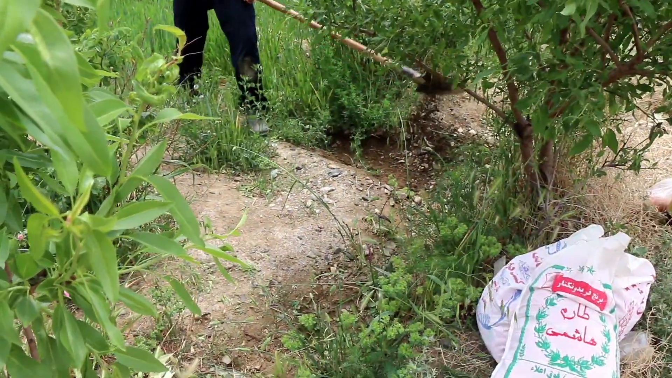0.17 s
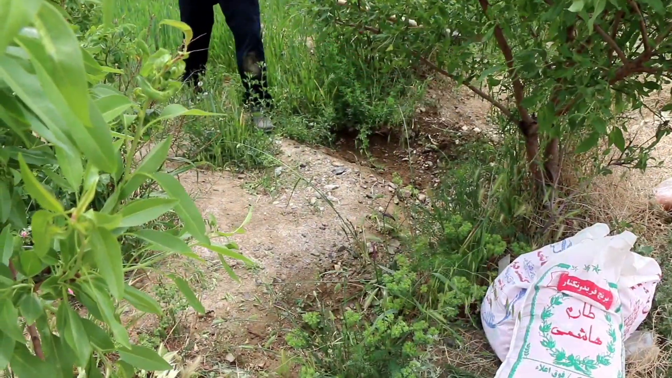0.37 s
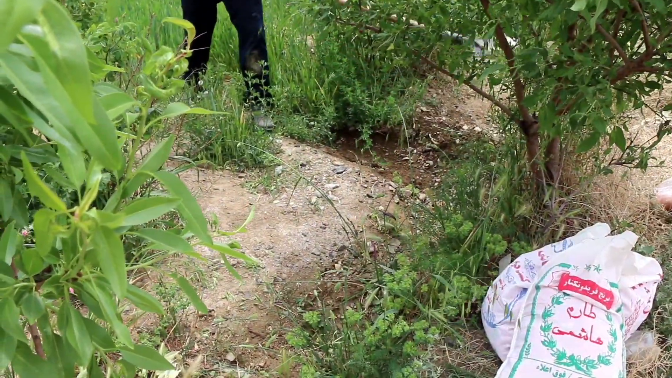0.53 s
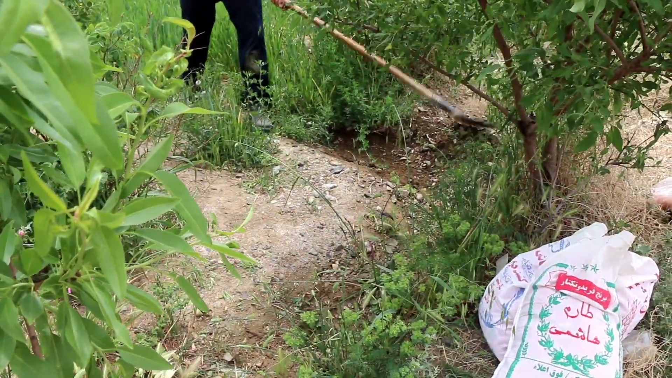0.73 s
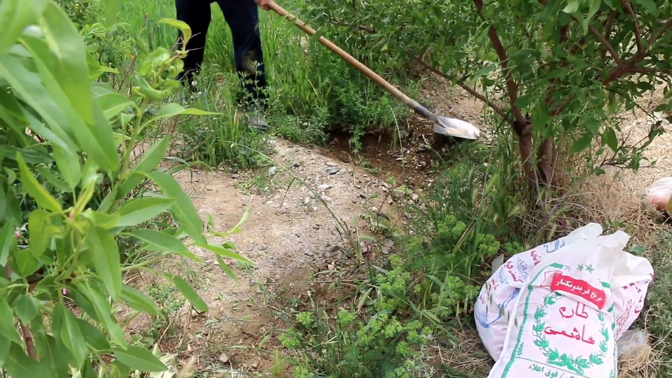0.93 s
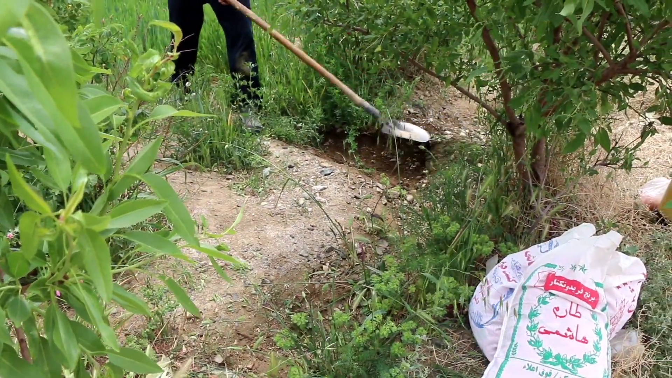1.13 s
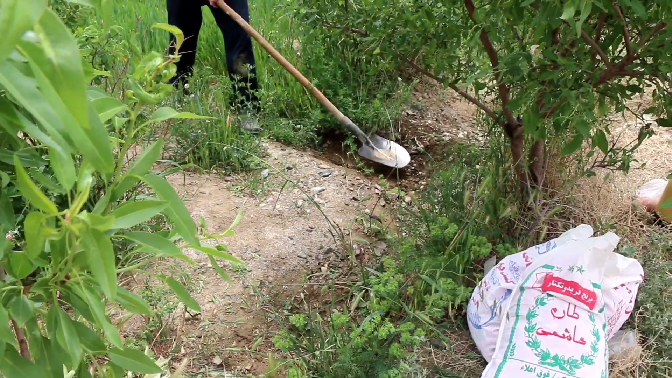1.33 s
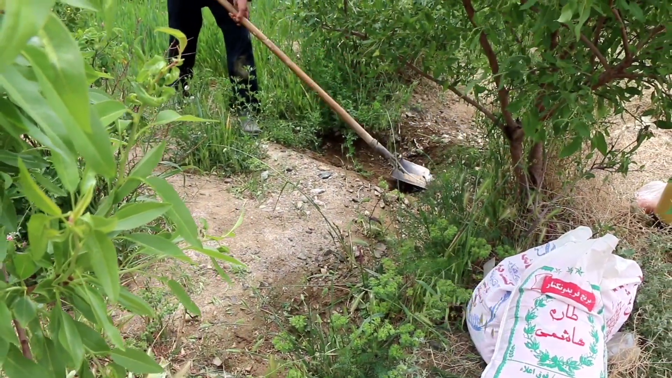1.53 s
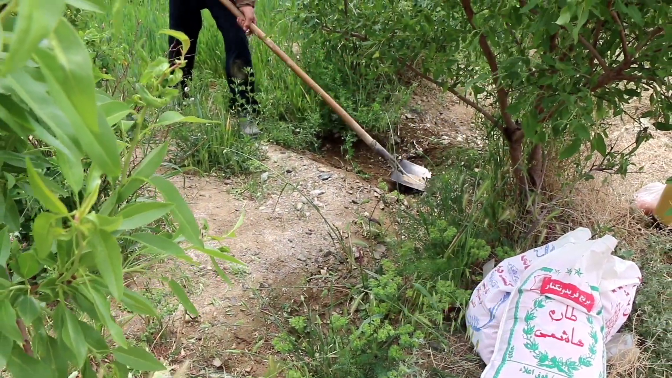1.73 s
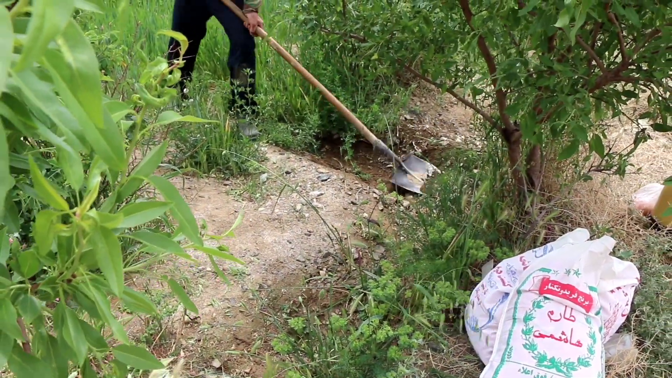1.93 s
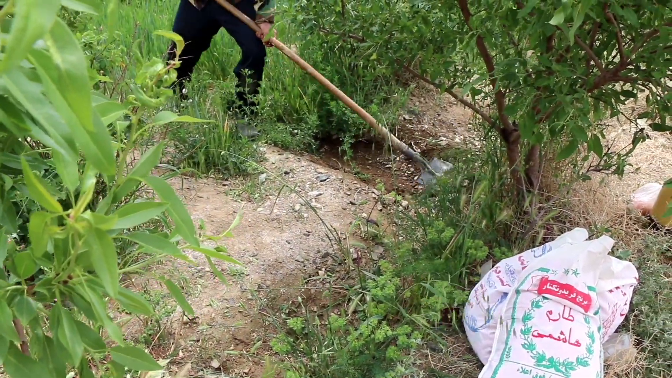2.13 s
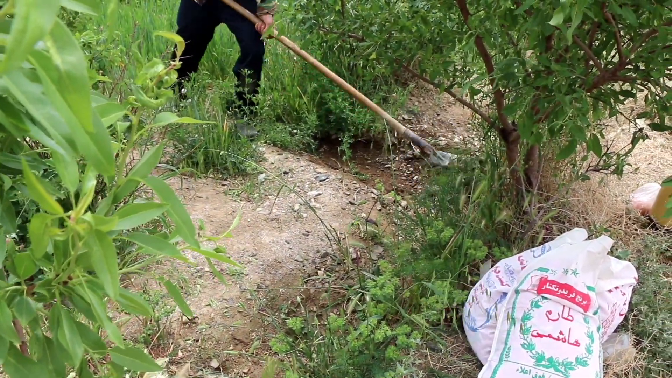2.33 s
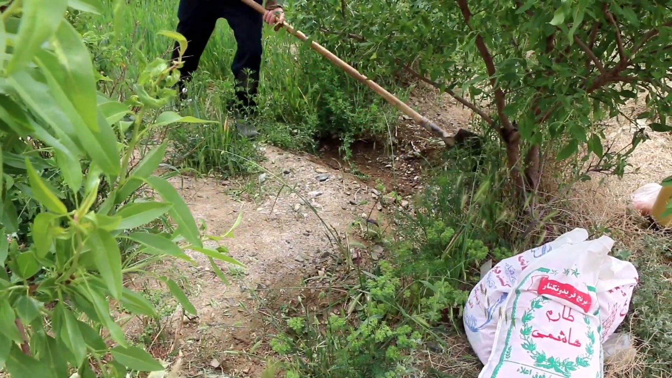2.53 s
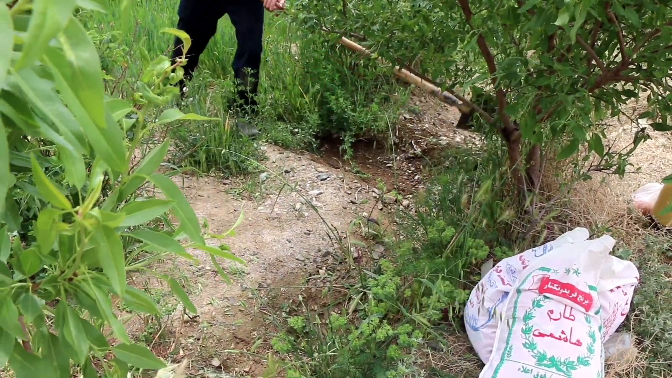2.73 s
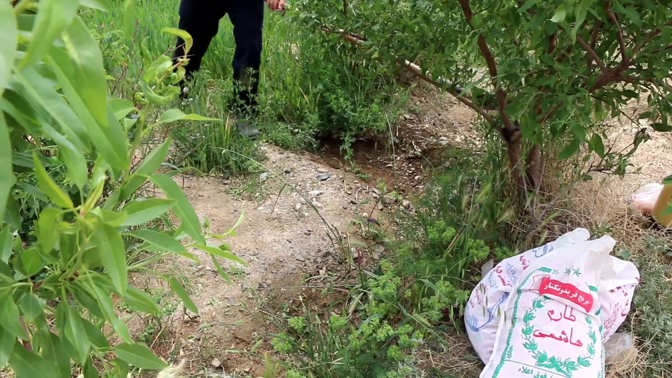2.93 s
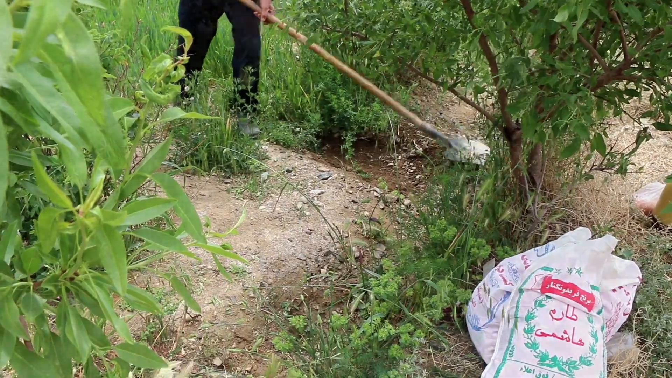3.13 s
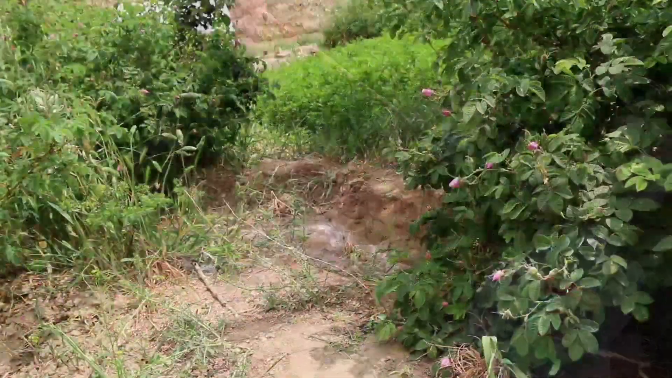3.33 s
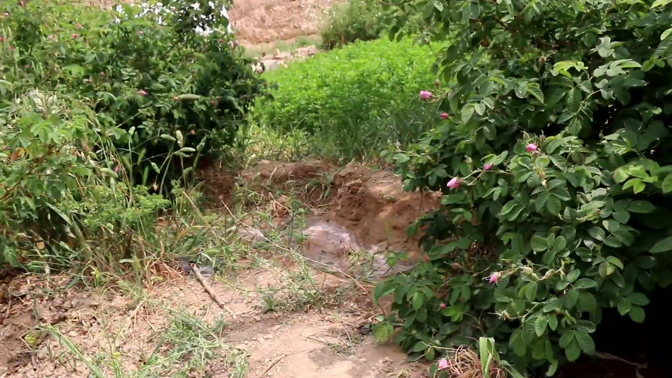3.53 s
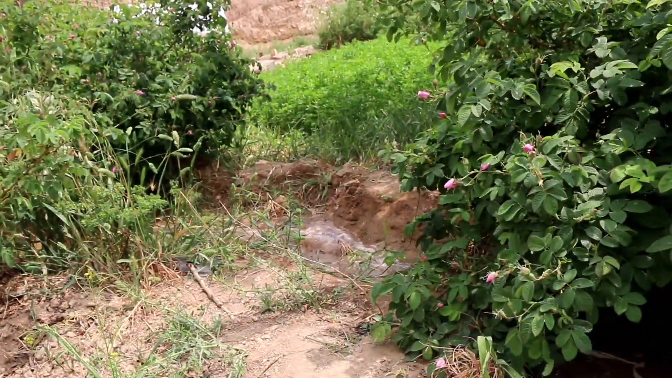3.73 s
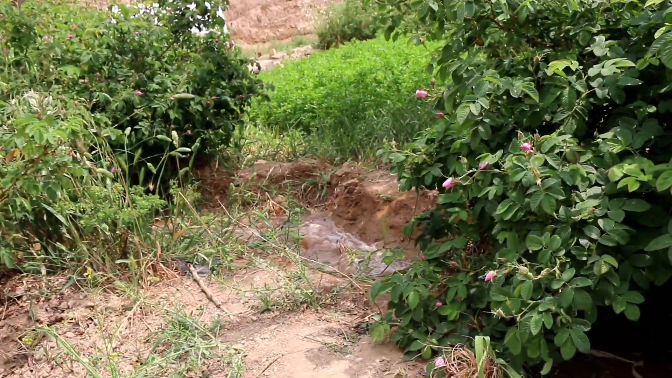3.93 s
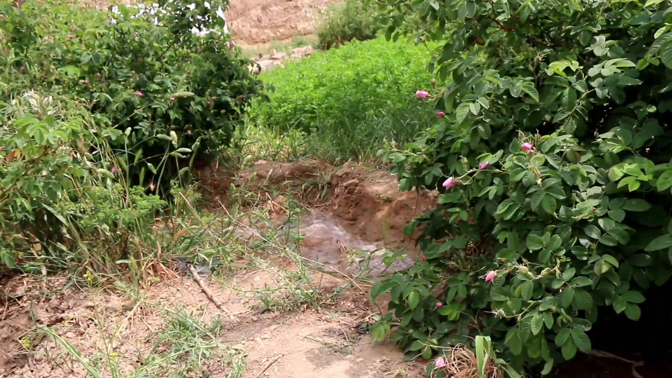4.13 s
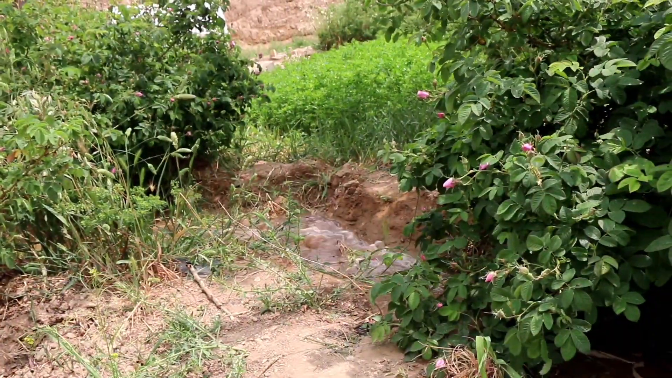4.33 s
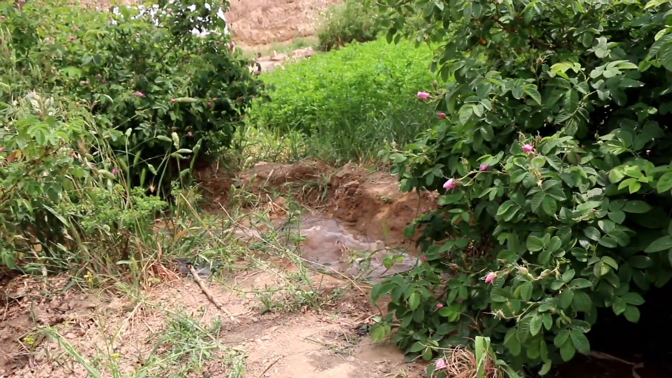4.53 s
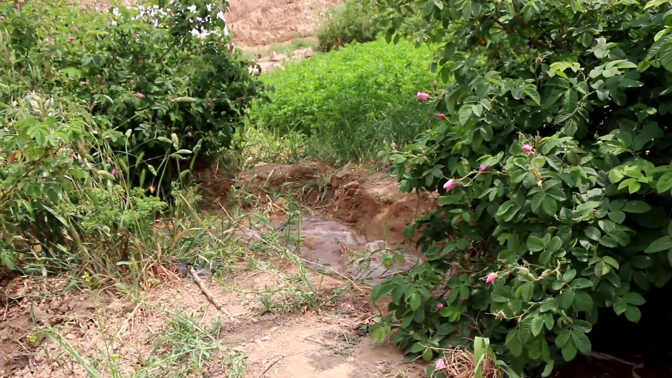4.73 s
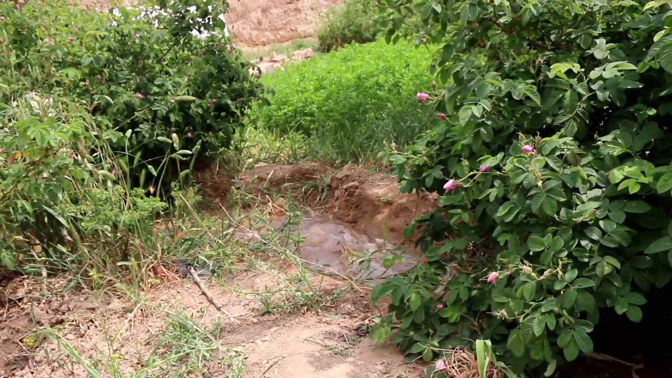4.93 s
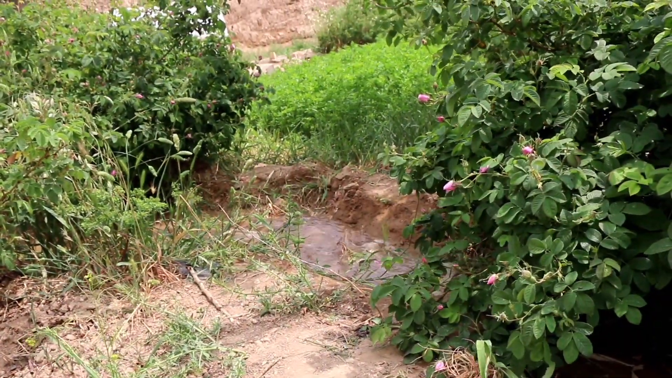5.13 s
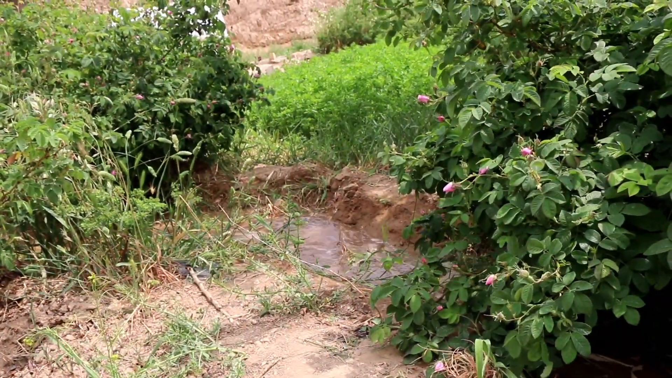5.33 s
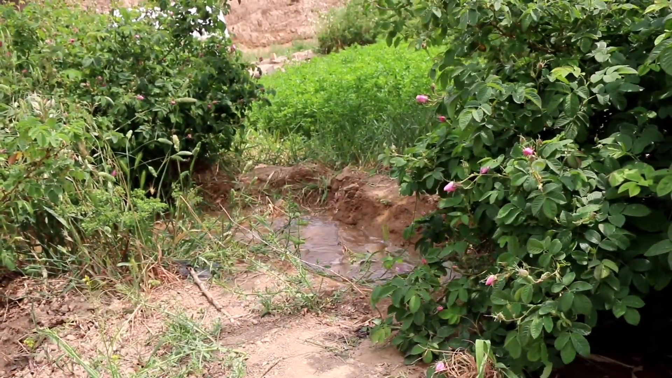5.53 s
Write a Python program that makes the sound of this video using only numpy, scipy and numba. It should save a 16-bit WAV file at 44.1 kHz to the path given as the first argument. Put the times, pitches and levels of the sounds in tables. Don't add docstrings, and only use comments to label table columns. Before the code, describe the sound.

A stereo phone outdoors picks up a shovel a few metres away, dry and without echo, over faint leaves. Early wind thumps until 0.3 s accompany small knocks and a gritty scrape, a clipped tick at 0.32, then crumbs ticking down. At 0.79 a very loud, bright stone-on-steel clank briefly dips the background, followed by rattling grit and thin squeaks to 1.1 and a soft trickle. A faint bird chirp falls at 1.37. A hard stab and clank hits at 1.5, then pattering crumbs. From 1.9 to 2.4 come the densest crunching scrapes and blows, strongest near 2.05. Light knocks, a brief metallic hum and sifting soil follow to 2.9. A last sharp blow at 3.18 spills a long trickle as water fades in, full by 3.4. Steady low gurgling and midrange fizz continue, with a small splash and thud near 5.37, under repeated deep, mostly left-leaning wind buffets to the end at about 5.7.

```python
import sys
import numpy as np
from scipy import signal
from scipy.fft import rfft, irfft
from scipy.io import wavfile
from scipy.ndimage import uniform_filter1d
from numba import njit

SR = 44100
rng = np.random.default_rng(int(sys.argv[2]) if len(sys.argv) > 2 else 0)


def persist_wave(psi):
    counts = np.round(np.clip(psi, -1, 1) * 32767).astype(np.int16)
    wavfile.write(sys.argv[1], SR, np.atleast_2d(counts).T)


def to_linear_factor(level_db):
    exponent = np.asarray(level_db, float) / 20
    return 10 ** exponent


N = 250488
SECONDS = np.arange(N) / SR
FREQS_HZ = np.maximum(np.arange(N // 2 + 1) * SR / N, 1)

# hardest push [s], grit level [dB], rise [s], fall [s], relative thud [dB].
STROKES = [(.124, -33, 0.16, 0.083, -23), (.72, -41, .005, 0.043, -10), (0.784, -32.5, 0.037, 0.0043, -13),
           (0.828, -30.5, 0.0086, 0.06, -11), (.93, -39, 0.081, 0.19, -21), (1.05, -40, 0.13, 0.084, -5.5),
           (1.521, -23, .006, 0.075, -6), (1.92, -33, 0.078, 0.097, 0), (2.053, -19, 0.06, 0.01, -3),
           (1.981, -28.5, 0.013, 0.091, -1), (2.088, -28.5, 0.11, 0.11, 0), (2.201, -37, 0.089, 0.038, 4),
           (2.311, -40, 0.14, 0.022, -6), (2.42, -51, 0.23, 0.068, -15), (2.6, -32, 0.18, 0.2, -36),
           (2.715, -42, 0.21, 0.016, -32), (2.84, -58, 0.13, 0.22, -21)]
# peak [s], grit level [dB], rise [s], fall [s], relative thud [dB].
TRICKLES = [
    (1.2, -42.5, 0.14, 0.095, -0.5),
    (1.32, -47, 0.21, 0.51, -3),
    (1.66, -46, 0.11, 0.22, -16),
    (1.78, -41.5, 0.052, 0.18, -6),
    (2.894, -41, 0.021, 0.021, 3),
    (3.25, -34.5, 0.012, 0.32, -8),
    (.55, -54, 0.27, 0.15, 3),
]
STROKE_FADE_DB, STROKE_ROUND = 24, 1.32
STROKE_TREBLE_DB, TRICKLE_TREBLE_DB, TREBLE_DB_PER_PUSH_DB = -8, -22.5, 0.041
# start [s], peak [dB], relative treble [dB], decay t60 [s].
BITES = [(0.403, -28.5, -14, 0.079), (0.519, -34.5, 3.5, 0.037), (1.5064, -3, -10, 0.053),
         (1.5308, -8.5, -13, 0.077), (1.552, -18, -21, 0.039), (1.566, -15, -11, 0.019),
         (1.8987, -25.5, -3, 0.082), (1.931, -30, -.3, 0.03), (1.9393, -23, -.3, .03),
         (1.9642, -11.5, -8, 0.093), (2.0005, -14, -12, 0.04), (2.0495, -9.5, -2, 0.016),
         (2.0537, -3.5, -8, 0.018), (2.0889, -5.5, -28, 0.014), (2.2, -24, -25, .04),
         (2.156, -24, -20, .03), (2.3273, -14, -17, 0.068), (2.371, -22.5, -17, 0.05),
         (2.45, -28, -5, 0.029), (2.5176, -28, -8, 0.037), (2.9333, -30, -25, 0.018),
         (3.181, -2.5, -7, 0.035), (3.248, -18.5, -20, 0.051), (3.2868, -22, -11, 0.054),
         (5.373, -17.5, -23, 0.088)]
# start [s], peak [dB], relative treble [dB], decay t60 [s].
KNOCKS = [(0.038, -19.5, -20.5, 0.086), (0.0697, -25, -8, 0.043), (0.082, -16.5, -32.5, 0.026),
          (0.091, -21, -21, 0.034), (0.117, -20, -24, 0.026), (0.1344, -32, -26, 0.051),
          (0.32, -14, -12, 0.0063), (0.3232, -12.5, -5, 0.011), (0.327, -23, -4, .02),
          (0.7175, -26, -11, 0.04), (.7245, -31, 0, .04), (0.7682, -24, -9, 0.056), (.757, -33, -6, .04),
          (0.7904, 1, -2.5, 0.026), (0.7929, -1.5, -2.5, 0.033), (0.802, -9.5, -5, .05),
          (0.8105, -10, -6.5, 0.057), (.845, -27, -9, 0.055), (0.903, -29, -11, 0.064),
          (0.933, -30, -2, 0.036), (.9445, -27, -8, .025), (0.9646, -27, -11, 0.06),
          (.98, -23.5, -14, 0.067), (.992, -23, -10, 0.044), (1.024, -34, -4, 0.057), (1.031, -32, -4, .04),
          (1.038, -28, -3, .04), (1.046, -28, -5, .03), (1.077, -33, -12, .04), (1.4989, -0.5, -13, 0.047),
          (1.513, -6.5, -3, 0.04), (2.018, -12, -9, .05), (2.0256, -7.5, -4, 0.033), (2.033, -13, -8, .025),
          (2.042, -11, -11, .04), (2.121, -28, -22, .04), (2.105, -13, -22, 0.018),
          (2.389, -24, -11, 0.032), (2.557, -21, -12, 0.02), (2.5648, -9.5, -23, 0.021),
          (2.613, -25.5, -31, 0.16), (2.6668, -23.5, -4, 0.12), (2.7109, -24, 0.5, 0.081),
          (3.181, -2, -17, 0.046), (3.186, -5, -7.5, 0.027)]
BITE_THUD_DB, KNOCK_THUD_DB, BITE_CRACK_DB, KNOCK_CRACK_DB = -4.5, -24, -3, 3
# frequency [Hz], density [dB per Hz].
GRIT_SPECTRUM = [(120, -78), (200, -17), (508, -14), (706, -6.5), (981, -18), (1470, -4), (2110, -6.5),
                 (2540, 1), (3280, -3), (3940, -2.5), (5180, -6), (5890, -5.5), (6570, -5), (11000, -7),
                 (15800, -23.5)]
# frequency [Hz], level [dB], t60 [s].
BLADE_MODES = [(1270, -19, 0.048), (1525, -8.5, 0.039), (1750, -4, 0.11), (1898, -5, 0.059),
               (2500, -15, 0.12), (2630, -14.5, 0.014), (2900, -9, 0.19), (3070, -29, 0.023),
               (3700, -15.5, 0.034), (3950, -14, 0.029), (4820, -22, 0.018), (5920, -3, 0.035),
               (7380, -4, 0.03), (8640, -16, 0.025)]
# peak [s], level [dB], rise [s], fall [s].
SINGING = [
    (.41, -57, .06, .15),
    (.57, -56, .13, .07),
    (2.825, -51, .04, .06),
    (2.885, -49, .05, .025),
]
# peak [s], level [dB], rise [s], fall [s].
HUMMING = [
    (2.6, -48, .11, 0.061),
    (2.67, -61, 0.036, 0.035),
    (2.72, -45, 0.03, 0.069),
]
# peak [s], level [dB], rise [s], fall [s].
BOWED = [
    (.05, -46, .05, .05),
    (.16, -45, .06, .04),
    (.09, -46, .06, .1),
    (.92, -48, .04, .06),
    (1.045, -44, .04, .06),
    (1.03, -52, .12, .02),
    (1.91, -42, .03, .03),
    (2.63, -44, .05, .05),
]
BOWED_HZ = [2550, 2520, 1650, 2500, 2510, 7120, 2550, 2950]
BOWED_T60_S = 0.038
# start [s], peak [dB], frequency [Hz], t60 [s].
PINGS = [(.322, -22, 4580, 0.0088), (.324, -36, 370, 0.034), (0.563, -39, 2610, 0.045),
         (.718, -33, 3300, 0.026), (0.794, -12, 2920, 0.035), (0.811, -22, 1785, 0.068),
         (0.934, -28.5, 3710, 0.054), (1.4, -34, 3400, .03), (.99, -43, 3300, .03), (0.06, -30, 2500, .04),
         (0.11, -33, 2500, 0.037), (2.625, -34, 2200, .05), (2.655, -25, 3000, 0.038),
         (1.025, -33, 4770, 0.026), (1.553, -19.5, 1270, 0.045), (1.507, -11, 1460, 0.056),
         (2.5, -16.5, 2570, 0.018), (2.445, -33, 490, 0.0061), (2.559, -25, 8400, 0.029),
         (2.615, -22, 1724, 0.081), (3.19, -17.5, 1750, 0.056), (2.0892, -14.5, 1290, 0.014),
         (1.4992, -15.5, 5400, 0.015), (1.512, -17, 2700, 0.032), (1.531, -23, 3200, .035),
         (1.542, -23, 2700, .03), (1.552, -25, 2400, .04), (.8, -25, 8400, 0.079), (.802, -23, 9800, 0.039),
         (.769, -34, 2700, .03), (3.182, -11.5, 4790, 0.017), (.117, -26, 1600, 0.018),
         (0.87, -32, 3700, .025), (2.935, -40.5, 1360, 0.012)]
CHIPS_DB = -9.5
# start [s], peak [dB].
CRUMBS = [(0.2104, -49), (0.2548, -42), (0.2803, -28), (0.2972, -34), (0.3444, -37), (0.397, -28),
          (0.4337, -23.5), (0.4717, -25), (0.4908, -27), (0.5196, -49), (0.551, -32), (0.5994, -71),
          (1.6594, -29.5), (1.7834, -28), (1.8307, -47), (1.846, -32), (2.4239, -30), (2.4723, -29),
          (2.4955, -25), (2.734, -36), (2.7913, -26)]
# start [s], peak [dB].
SIFTED = [(.027, -36), (.132, -31), (.204, -40), (.376, -34), (.421, -36), (1.386, -42), (1.59, -32),
          (1.612, -40), (1.903, -23), (2.2799, -36), (2.70, -28), (2.772, -40), (2.816, -40), (2.833, -41),
          (2.848, -41), (2.8706, -38), (2.886, -38), (2.899, -38), (2.9395, -35), (2.975, -42),
          (3.015, -39)]
# frequency [Hz], density [dB per Hz].
CRUMB_SPECTRUM = [(1500, -15), (3500, -2), (6000, 0), (10000, -1.5), (16000, -15)]
# peak [s], level [dB], rise [s], fall [s].
DUST = [
    (1.038, -52, 0.054, 0.051),
    (1.198, -62, 0.077, 0.13),
    (2.78, -54, 0.073, 0.13),
    (2.95, -56, 0.11, .1),
    (3.35, -48.5, 0.11, 0.3),
    (2.45, -52, 0.15, .1),
]
# frequency [Hz], density [dB per Hz].
DUST_SPECTRUM = [(2000, -22), (5000, 3), (9000, 0), (15800, -7)]
# time [s], fizz level [dB].
FLOW = [
    (3.36, -36.5),
    (3.83, -35),
    (4.44, -36),
    (4.78, -35),
    (5.36, -36.5),
    (5.38, -32),
    (5.41, -35.5),
    (5.68, -33),
]
# frequency [Hz], density [dB per Hz].
FIZZ_SPECTRUM = [(350, -1.5), (600, 4), (983, 0.5), (1080, -3), (1400, 1), (1590, -2.5), (2300, 4),
                 (2710, -4.5), (3330, 1.5), (4330, 0.5), (5320, -9.5), (6010, -6.5), (6620, -13),
                 (13000, -21.5), (15900, -26)]
# frequency [Hz], density [dB per Hz].
GURGLE_SPECTRUM = [(88, 1.5), (150, -4), (184, -7), (322, 2.5), (425, 0), (462, 1.5), (609, -7.5),
                   (900, -16), (1170, -41), (1980, -120)]
GURGLE_DB, GURGLE_SURGE_SHARE = -32.5, 0.65
FULL_FLOW_S, FIZZ_FADE_DB_PER_S, GURGLE_FADE_DB_PER_S = 3.404, 46, 41
# peak [s], level [dB], left minus right [dB], half length [s].
GUSTS = [(0.001, -44, -17, 0.025), (0.095, -28.5, 18, 0.032), (0.154, -27.5, -6, 0.097),
         (0.216, -26.5, 5.5, 0.049), (0.345, -43.5, -5, 0.11), (1.998, -45.5, -12, 0.043),
         (2.088, -41, 6, 0.059), (2.181, -44, -18, .06), (2.58, -53, 6, 0.21), (3.017, -41.5, 11, 0.062),
         (3.136, -30.5, 14.5, 0.07), (3.287, -36, -13, 0.059), (3.668, -27, 21.5, 0.078),
         (3.84, -33, 10.5, 0.25), (3.937, -41, 1, 0.061), (3.975, -38, 10, 0.073), (4.09, -38, 15, .04),
         (4.226, -33.5, 8, 0.042), (4.353, -24, 9, 0.059), (4.427, -38, 22, 0.032),
         (4.602, -28, 12.5, 0.064), (4.69, -32, -13, 0.044), (4.81, -24.5, 12.5, 0.043),
         (5.034, -28, 11, 0.084), (5.092, -22, 5, 0.086), (5.232, -29, -5, 0.13), (5.323, -26, 7, 0.043),
         (5.363, -24, 16.5, 0.044), (5.62, -30, 13.5, 0.1)]
# frequency [Hz], density [dB per Hz].
WIND_SPECTRUM = [(8.8, -47), (15, -32), (59, 6.5), (116, 0), (219, -9), (400, -30), (520, -37), (880, -120)]
GUST_FADE_DB, GUST_ROUND = 19, 1.13
BREEZE_DB, DITCH_BREEZE_DB, DITCH_S = -60, -47.5, 3.0
# frequency [Hz], density [dB per Hz].
ORCHARD_SPECTRUM = [(88, 1), (150, 3.5), (297, -5), (406, -1), (852, -5.5), (1020, -2.5), (1260, -6),
                    (3340, -11.5), (5770, -19), (9780, -22), (15900, -27.5)]
ORCHARD_DB = -45
CHIRP_S, CHIRP_DB, CHIRP_HZ, CHIRP_FALL_HZ_PER_S, CHIRP_LENGTH_S = 1.365, -50, 3550, 30000, .014
DUCK_S, DUCK_DB, DUCK_BACK_S = 0.814, -12, 0.071
SHOVEL_LAG_SAMPLES = -1.1
TOP_HZ = 15850


def shovel():
    crackle = unit(rng.standard_normal((2, 3, N)) * to_linear_factor(2.0 * rng.exponential(size=(2, 1, N))))
    slide = sliding() * crackle[0]
    power, cracks = impacts()
    blows = np.sqrt(power) * crackle[1] + cracks
    edges_hz = [(1200, 5000), (5000, SR), (0, 1200)]
    grit = sum(colour(part, GRIT_SPECTRUM, *edges) for part, edges in zip(slide + blows, edges_hz))
    return to_linear_factor(-5.5) * grit + blade_ring(slide, blows) + blade_song(crackle)


def sliding():
    judder = to_linear_factor(-2.2 + 0.7 * walk(70) + 2.8 * walk(300))
    rows = [(*row, STROKE_TREBLE_DB) for row in STROKES] + [(*row, TRICKLE_TREBLE_DB) for row in TRICKLES]
    slide = 0
    for s, db, rise_s, fall_s, thud_db, treble_db in rows:
        share = to_linear_factor([[0], [treble_db + TREBLE_DB_PER_PUSH_DB * (db + 56)], [thud_db]])
        slide = slide + share * (judder * swell(s, db, rise_s, fall_s, STROKE_FADE_DB, STROKE_ROUND))
    return slide


def impacts():
    rows = [(*row, BITE_THUD_DB, BITE_CRACK_DB) for row in BITES]
    rows += [(*row, KNOCK_THUD_DB, KNOCK_CRACK_DB) for row in KNOCKS]
    power, cracks = np.zeros((2, 3, N))
    age_s = SECONDS[:SR // 5]
    for s, db, high_db, t60_s, low_db, crack_db in rows:
        start = int(s * SR)
        cracks[:, start] += to_linear_factor(db + crack_db + np.array([0, high_db, low_db + 10.5]))
        bands = [(-6, 1, .0004), (high_db - 2.0, .8, .0002), (low_db - 10.0, 1.3, .002)]
        for band, (band_db, stretch, rise_s) in enumerate(bands):
            decay = to_linear_factor(-60 * age_s / (stretch * np.clip(t60_s, .006, .15)))
            shape = np.clip(age_s / rise_s, 0, 1) * decay
            power[band, start:start + len(age_s)] += (to_linear_factor(db + band_db) * shape) ** 2
    return power, cracks


def blade_ring(slide, blows):
    push = to_linear_factor(-7.0) * slide + to_linear_factor(-14.0) * blows
    ring = 0
    for hz, db, t60_s in BLADE_MODES:
        drive = push[int(hz > 5000)]
        ring = ring + to_linear_factor(db) * resonance(to_linear_factor(4.6 * walk(60)) * drive, hz, t60_s)
    return ring


def blade_song(crackle):
    singing = unit(resonance(rng.standard_normal(N), 1752, 0.15))
    song = sum(swell(*row, 12, 2) for row in SINGING) * singing
    humming = unit(resonance(crackle[0, 2], 1275, .1))
    song = song + to_linear_factor(-3) * sum(swell(*row, 15, 2) for row in HUMMING) * humming
    for row, hz in zip(BOWED, BOWED_HZ):
        song = song + swell(*row, 11.0, 1.4) * unit(resonance(crackle[1, 2], hz, BOWED_T60_S))
    for s, db, hz, t60_s in PINGS:
        impulse = 1. * (abs(SECONDS - s) < .5 / SR)
        song = song + to_linear_factor(db + 24.5) * resonance(impulse, hz, t60_s)
    return song


def chips():
    slide = sum(swell(*row[:4], STROKE_FADE_DB, STROKE_ROUND) for row in STROKES)
    rings = bubbles(count=3500, lo_hz=1146, hi_hz=6260, cycles=7.5, spread_db=5.0, glide=-0.03)
    return to_linear_factor(CHIPS_DB) * slide * colour(rings, GRIT_SPECTRUM)


def crumbs(table):
    push = np.zeros(N)
    for (s, db), noise in zip(table, rng.standard_normal((len(table), 400))):
        start = int(s * SR)
        push[start:start + 400] += to_linear_factor(db - 3) * noise * np.exp(-SECONDS[:400] / .0015)
    return colour(push, CRUMB_SPECTRUM)


def dust():
    specks = unit(rng.standard_normal(N) * to_linear_factor(3.7 * rng.exponential(size=N) + 3.6 * walk(90)))
    return colour(specks * sum(swell(*row, 11.0, 1.1) for row in DUST), DUST_SPECTRUM)


def water():
    early_s = np.maximum(FULL_FLOW_S - SECONDS, 0)
    surge_db = np.interp(SECONDS, *np.transpose(FLOW))
    fizz_db = surge_db + 0.45 - FIZZ_FADE_DB_PER_S * early_s
    gurgle_db = GURGLE_DB - GURGLE_FADE_DB_PER_S * early_s + GURGLE_SURGE_SHARE * (surge_db - surge_db.mean())
    fade = np.clip((SECONDS - 2.9) / 0.23, 0, 1)
    fizzing = to_linear_factor(fizz_db + 1.3 * walk(45)) * fizz()
    gurgling = to_linear_factor(gurgle_db + 2.0 + 1.1 * walk(30)) * gurgle()
    return ports(fade * (fizzing + gurgling), 2.36, -1.37, 11300, 4.2, 0.053)


def gurgle():
    big = bubbles(count=4500, lo_hz=168.7, hi_hz=613.5, cycles=5.9, spread_db=2.0, glide=0.22)
    return unit(colour(big + 2.32 * rng.standard_normal(N), GURGLE_SPECTRUM))


def fizz():
    spray = rfft(unit(colour(rng.standard_normal(N) * to_linear_factor(1.64 * rng.exponential(size=N)), FIZZ_SPECTRUM)))
    hiss = 0
    for lo_hz, hi_hz in [(0, 1700), (1700, 2750), (2750, 5400), (5400, SR)]:
        part = irfft(spray * ((FREQS_HZ >= lo_hz) & (FREQS_HZ < hi_hz)), N)
        hiss = hiss + part * to_linear_factor(1.4 * walk(35) + .3 * walk(2.87))
    fine = bubbles(count=5000, lo_hz=920, hi_hz=5200, cycles=7.2, spread_db=2.0, glide=0.35)
    return to_linear_factor(-0.05) * hiss + to_linear_factor(-6.5) * unit(colour(fine, FIZZ_SPECTRUM))


def bubbles(count, lo_hz, hi_hz, cycles, spread_db, glide):
    when, pitch, size = rng.random((count, 3)).T
    size_db = -spread_db * np.log(1 - .95 * size)
    hz = lo_hz * (hi_hz / lo_hz) ** pitch
    return unit(grains((when * N).astype(np.int64), hz, cycles, to_linear_factor(size_db), glide))


@njit
def grains(start, hz, cycles, size, glide):
    out = np.zeros(N)
    for k in range(len(start)):
        length = int(3 * cycles * SR / hz[k])
        phase = 0.
        for i in range(min(length, N - start[k])):
            u = i / length
            phase += 2 * np.pi * hz[k] * (1 + glide * u) / SR
            out[start[k] + i] += size[k] * np.sin(phase) * np.exp(-6 * u)
    return out


def wind():
    gust = to_linear_factor(np.where(SECONDS < DITCH_S, BREEZE_DB, DITCH_BREEZE_DB)) + np.zeros((2, 1))
    for s, db, lean_db, half_s in GUSTS:
        lean = to_linear_factor([[lean_db / 2], [-lean_db / 2]])
        gust = gust + lean * swell(s, db, half_s, half_s, GUST_FADE_DB, GUST_ROUND)
    gust_db = 20 * np.log10(gust).mean(axis=0)
    deep = np.array([colour(rng.standard_normal(N), WIND_SPECTRUM, 0, 85) for _ in range(2)])
    flutter = np.array([colour(rng.standard_normal(N), WIND_SPECTRUM, 85, SR) for _ in range(2)])
    puffs = to_linear_factor(-3.0) * deep + to_linear_factor(0.38 * (gust_db + 36.0)) * flutter
    steady = puffs / np.sqrt(uniform_filter1d(puffs ** 2, 1800) + 0.44)
    return gust * steady


def orchard():
    far = colour(rng.standard_normal(N), ORCHARD_SPECTRUM) * to_linear_factor(ORCHARD_DB - 4.5 + 0.16 * walk(3.7))
    return ports(far, -2.2, -2.5, 1450, 6.1, 0.092)


def bird():
    age_s = np.clip(SECONDS - CHIRP_S, -.05, .05)
    tone = np.sin(2 * np.pi * (CHIRP_HZ * age_s - CHIRP_FALL_HZ_PER_S * age_s ** 2 / 2))
    return tone * swell(CHIRP_S, CHIRP_DB, CHIRP_LENGTH_S, CHIRP_LENGTH_S, 8, 2)


def resonance(push, hz, t60_s):
    pole = np.exp(2j * np.pi * hz / SR - np.log(1000) / (t60_s * SR))
    return np.sqrt(1 - abs(pole)) * signal.lfilter([1], [1, -pole], push).imag


def swell(s, db, rise_s, fall_s, fade_db, round_top):
    away = np.where(SECONDS < s, (s - SECONDS) / max(rise_s, .001), (SECONDS - s) / max(fall_s, .001))
    return to_linear_factor(db - fade_db * np.minimum(away, 9) ** round_top)


def walk(rate_hz):
    k = max(int(SR / rate_hz), 2)
    held = np.repeat(rng.standard_normal(N // 2 + 1)[:N // k + 1], k)
    return unit(uniform_filter1d(uniform_filter1d(held, k), k)[:N])


def unit(x):
    return x / np.sqrt(np.mean(x ** 2))


def colour(x, spectrum, lo_hz=0, hi_hz=SR):
    hz, db = np.transpose(spectrum)
    band = 1 / np.sqrt((1 + (lo_hz / FREQS_HZ) ** 8) * (1 + (FREQS_HZ / hi_hz) ** 8))
    gain = unit(band * to_linear_factor(np.interp(np.log(FREQS_HZ), np.log(hz), db)))
    return irfft(rfft(x) * gain, N)


def ports(x, lag_samples, lean_db, apart_hz, apart_db, tail_s):
    turn = np.exp(1j * np.pi * FREQS_HZ * lag_samples / SR)
    scatter = to_linear_factor(apart_db) * FREQS_HZ / (FREQS_HZ + apart_hz)
    tail = rfft(rng.standard_normal((2, SR // 2)) * np.exp(-SECONDS[:SR // 2] / tail_s), N)
    late = np.exp(-4j * np.pi * FREQS_HZ * tail_s)
    both = np.array([turn, 1 / turn]) + scatter * late * tail / abs(tail)
    both = both * to_linear_factor([[lean_db / 2], [-lean_db / 2]])
    return irfft(rfft(x) * both / np.sqrt(turn.real ** 2 + scatter ** 2 / 2), N)


def scene():
    digging = ports(shovel() + to_linear_factor(-6.5) * crumbs(CRUMBS), SHOVEL_LAG_SAMPLES, -3.25, 8600, -9.5, 0.0043)
    fine_soil = to_linear_factor(-6.0) * crumbs(SIFTED) + dust() + chips()
    sifting = ports(fine_soil, SHOVEL_LAG_SAMPLES, -2.2, 6000, -2.0, 0.01)
    duck_db = DUCK_DB * (SECONDS > DUCK_S) * np.exp(-((SECONDS - DUCK_S) / DUCK_BACK_S) ** 2)
    return digging + sifting + bird() + water() + to_linear_factor(duck_db) * (wind() + orchard())


def band_limit(x):
    return signal.sosfilt(signal.butter(12, 16080, fs=SR, output="sos"), x)


def record(dry):
    rumble_cut = signal.butter(2, 28, "high", fs=SR, output="sos")
    top_cut = signal.ellip(8, .3, 40, TOP_HZ, fs=SR, output="sos")
    mix = signal.sosfilt(top_cut, signal.sosfilt(rumble_cut, dry))
    return band_limit(np.clip(mix, -1, 1))


dry = scene()
out = record(dry)
persist_wave(out)
```